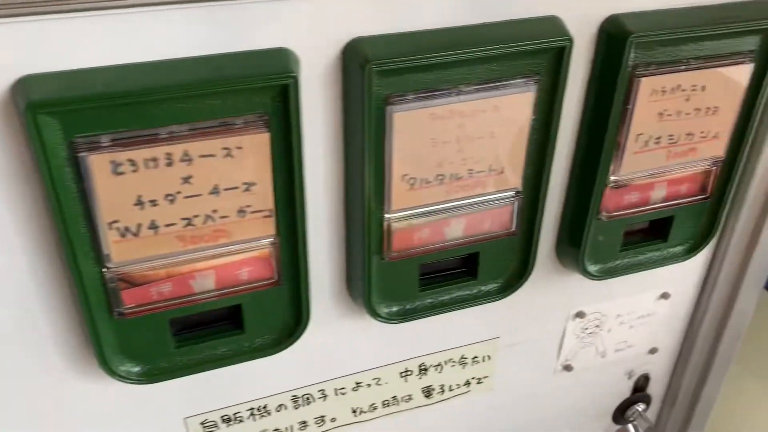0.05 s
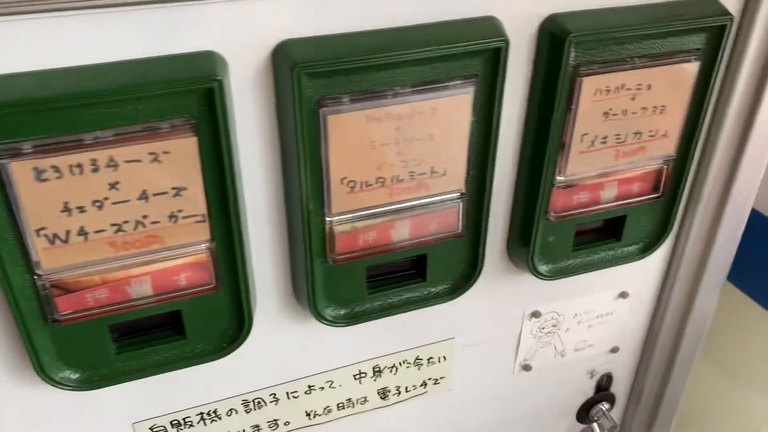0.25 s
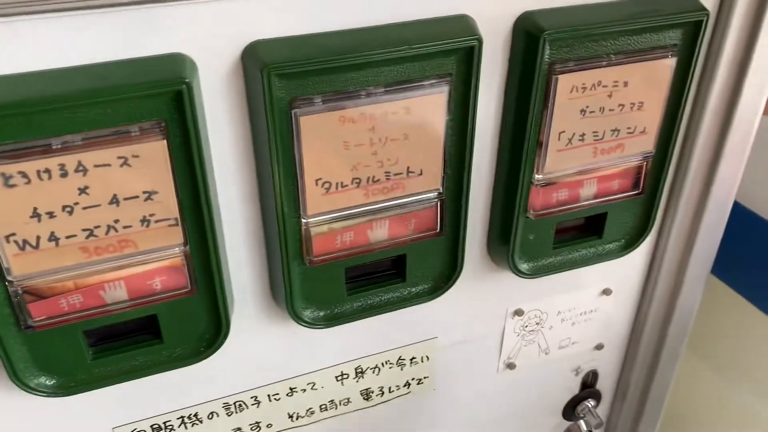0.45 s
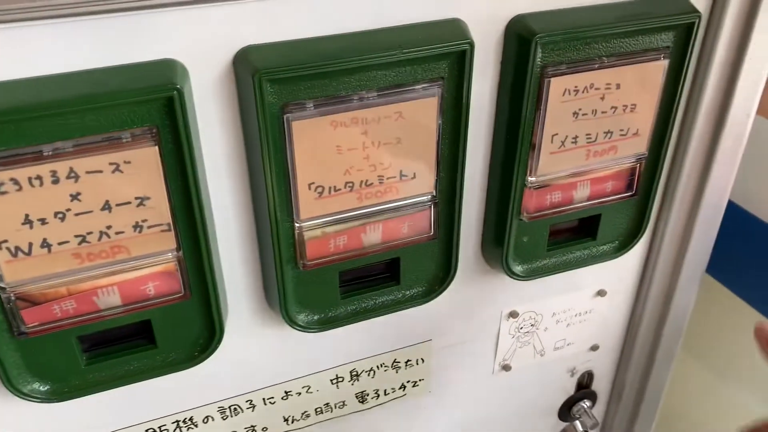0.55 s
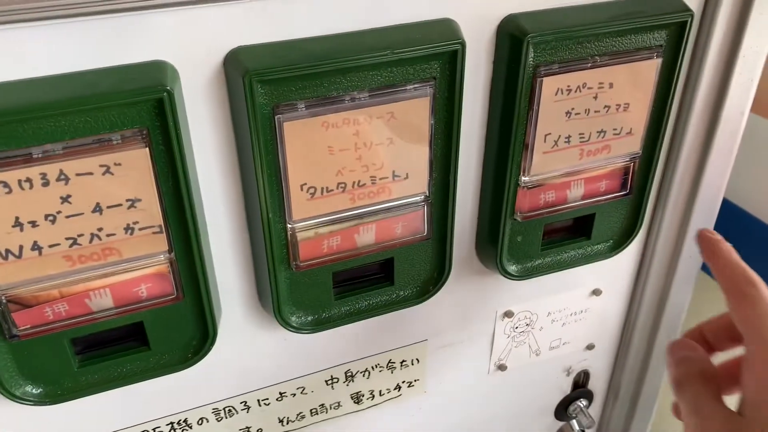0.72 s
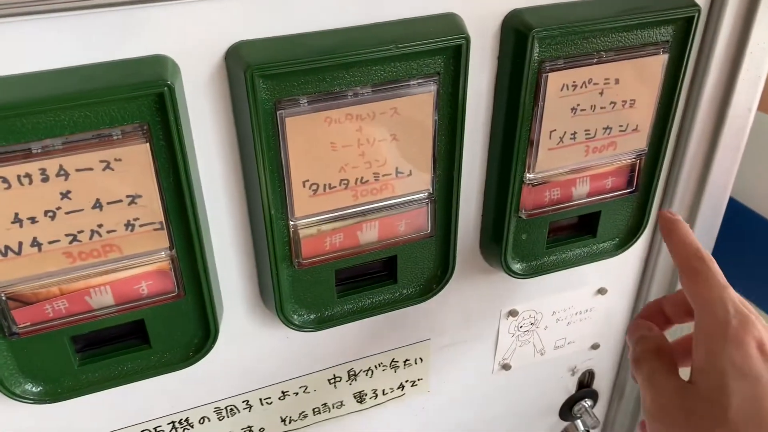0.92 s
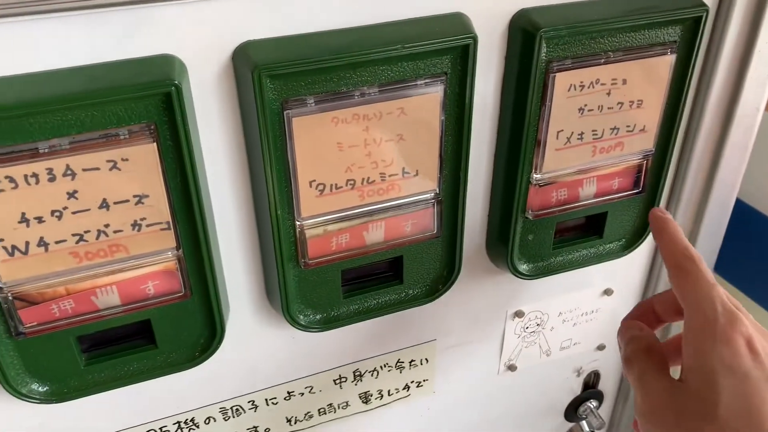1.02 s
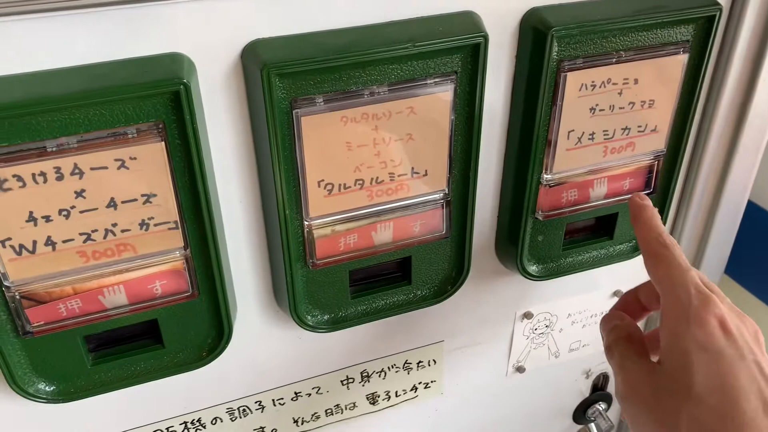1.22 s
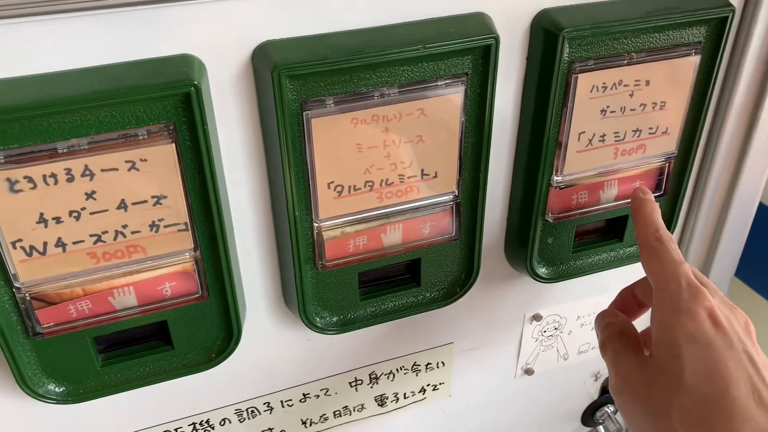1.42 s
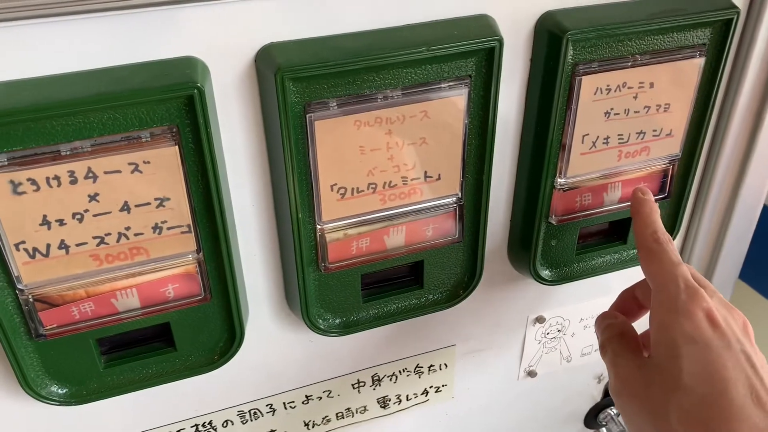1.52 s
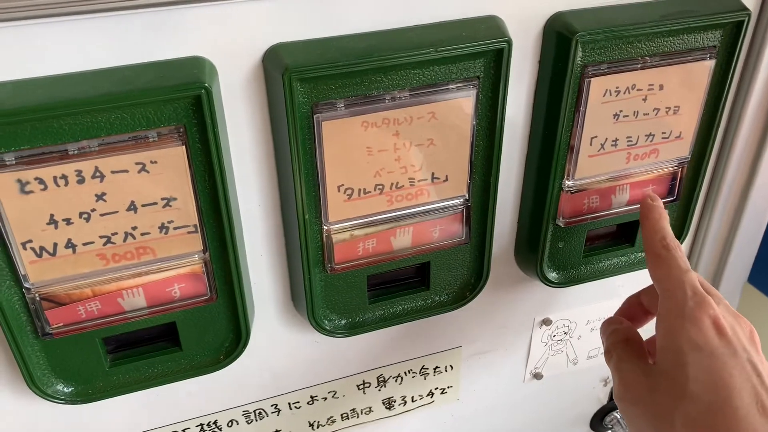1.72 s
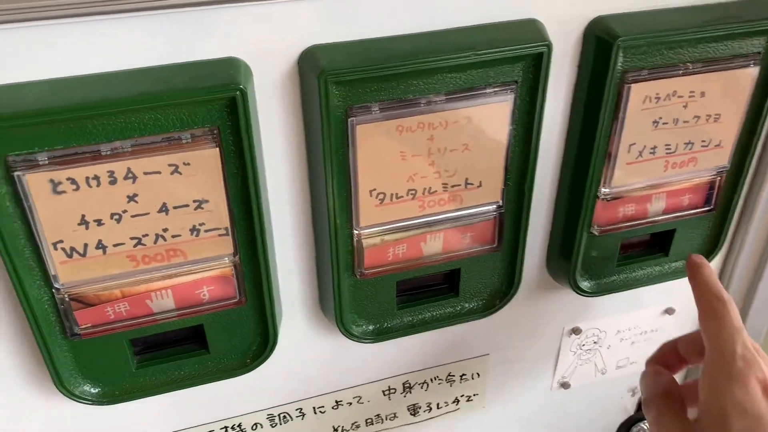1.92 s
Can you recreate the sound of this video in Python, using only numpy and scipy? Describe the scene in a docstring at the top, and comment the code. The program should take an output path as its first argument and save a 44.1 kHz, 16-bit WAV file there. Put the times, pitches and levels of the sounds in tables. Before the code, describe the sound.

A coin rattles and clunks through a vending machine, followed by a short mechanical whir.

```python
"""A coin clatters down behind the steel door of a vending machine, close up, and lands with two clunks.
Each blow cracks, shakes the cabinet and rings the chute, track and box; the coin adds its own chinks.
The mechanism rattles and whirs with a regular throb, then stops; a small metal part pings now and then.
A thin motor whine and a low rumble come up with the whir and linger. Under it all, the cooling
compressor hums in the dull fan noise of a small room."""
import sys
import numpy as np
from scipy import signal
from scipy.fft import rfft, irfft
from scipy.io import wavfile

SR = 44100
rng = np.random.default_rng(int(sys.argv[2]) if len(sys.argv) > 2 else 0)


def wrap_up_sound(samples):
    """Save the sound to the file named by the first command line argument, as 16-bit audio."""
    columns = np.atleast_2d(samples).T
    # keep every value between -1 and 1, then stretch to whole-number steps
    tamed = np.clip(columns, -1, 1)
    steps = np.round(tamed * 32767).astype(np.int16)
    wavfile.write(sys.argv[1], SR, steps)


N = 85995
T = np.arange(N) / SR
FREQS = np.maximum(np.arange(N // 2 + 1) * SR / N, 1)

# the coin's blows: t/s, level/dB, bass/dB, treble/dB, crack/dB, chute/dB, track/dB, box/dB
# (the crack has its own level; the other trims ride on the blow's level)
BLOWS = [(0.166, -46.5, -6, -6, -61, -14, -4, -13.5), (0.212, -30.5, 6.5, -11.5, -38, -13, -6, -26),
         (0.284, -42, -4.5, 4, -50, -18, -17, -8.5), (0.311, -27.5, -3.5, 2, -15.5, -15, 3, -12),
         (0.353, -28.5, 3, 3, -19, -22.5, 5, -17.5), (0.377, -26, -13, 2, -28.5, -13, -2, -7),
         (0.387, -22.5, 4.5, -1.5, -15.5, -3.5, -11, -21.5), (0.399, -29.5, -3.5, -14, -37, 5, -5, -20),
         (0.411, -18.5, -13, -2.5, -23, -7, 2.5, -18), (0.429, -21, -1, -10, -26, -4, 1.5, -12),
         (0.478, -23, 2, -7, -29.5, -0.5, 3, -8), (0.494, -28, 3, -3, -18.5, 3, -5, -21),
         (0.52, -26.5, 6.5, 2, -32, -8, -1, -14), (0.571, -17.5, -1.5, 5.5, -10, 1.5, -11, 1.5),
         (0.593, -21.5, 0, 7, -11, -25.5, -14, 1), (0.666, -18, -5, 3, -15, 4.5, -4.5, -1),
         (0.752, -26, -6.5, -0.5, -32, 3.5, -7.5, -5.5), (0.845, -35, 8, 8.5, -23, -5.5, -24.5, -2),
         (0.896, -41.5, -1, 5, -32, -16, -14, 0.5), (0.952, -39, -9, -13, -53, 5.5, 1.5, -9),
         (1.028, -41, -7, 4.5, -32, -12, -4, -1), (1.05, -41, -3, 0, -39, 2, 2, 3.5),
         (1.555, -49, -9, 7, -44, -17.5, -11.5, -2.5)]
# tone of the cabinet's dense ring and of the crack: f/Hz, level/dB
CABINET_COLOUR = [(100, -38), (250, -9.5), (480, -4.5), (700, -10), (1000, 3.5), (1450, -3), (2000, 1),
                  (3000, 3), (4600, -2.5), (7000, -8), (9500, -9.5), (11500, -10.5), (14000, 0.5),
                  (16000, -22.5)]
CRACK_COLOUR = [(300, -22), (2000, 2), (3200, 5.5), (4500, -4), (7000, -5.5), (9000, 2), (11500, -10.5),
                (14300, -0.5), (16000, -11)]
# the cabinet's quick decay and long tail: f/Hz, t60/s
CABINET_T60 = [(200, 0.51), (1000, 0.1), (3000, 0.14), (7000, 0.17), (14000, 0.021)]
TAIL_T60 = [(200, .6), (1000, 1), (3000, 0.43), (7000, 0.51), (14000, 0.15)]
# modes of the chute, upper track, lower box, coin and pawl: f/Hz, level/dB, t60/s
CHUTE_MODES = [(1001, 1, 0.14), (1131, -1, 0.097), (1144, -6, 0.35)]
TRACK_MODES = [(1790, -5, .12), (1950, -3, .09), (2140, -5, .15), (2366, -4.5, .25), (2510, -6, .2),
               (2573, -8, .25), (2830, -7, .15), (2940, -8, .18), (3040, -1, .07), (3253, -6, .14),
               (4400, -12, .16)]
BOX_MODES = [(1500, -13, .15), (1764, -7, .22), (1945, -8, .4), (2573, -9, .25), (2760, -11, .2),
             (2945, -8, .3), (3112, -7, .45), (3265, -10, .25), (3415, -7, .22), (3499, -7, .18),
             (3595, -8, .33), (3956, -12, .22), (4361, -9, .25), (4651, -10, .25), (4803, -12, .28),
             (6240, -15, .2), (6470, -13, .2), (9189, -14, .18)]
COIN_MODES = [(7467, -3, 0.2), (13300, -5, .05), (14416, -1, 0.06), (14900, -5, .05)]
PAWL_MODES = [(4764, 0, .17), (4880, -7, .1), (5190, -11, .12)]
# cues for the coin's chinks and the pawl's pings: t/s, level/dB
CHINKS = [(0.388, -33), (0.45, -38), (0.479, -36), (0.495, -24)]
PINGS = [(0.285, -39), (0.944, -44), (1.027, -30.5), (1.187, -40.5), (1.252, -43), (1.368, -46)]
# fader curves of the whir and the rumble: t/s, level/dB
WHIR_FADER = [(.74, -52), (.82, -33.5), (.93, -40), (1.0, -35.5), (1.07, -36.5), (1.16, -43), (1.4, -43.5),
              (1.56, -43), (1.68, -43)]
RUMBLE_FADER = [(0, -65), (.76, -46.5), (.87, -40.5), (1.25, -39), (1.45, -47), (1.95, -46)]
# tone of the whir and of the room: f/Hz, level/dB
WHIR_COLOUR = [(200, 11), (600, -14.5), (1100, 13), (1550, 1), (2400, 2), (4000, -2), (5200, 2.5),
               (8000, -10.5), (10500, -18.5), (13000, -8), (16000, -23)]
ROOM_COLOUR = [(25, -20), (43, 8.5), (62, -21), (100, 2.5), (200, -0.5), (300, -9.5), (450, -9),
               (640, -15.5), (900, -14), (1400, -22), (2300, -24), (3500, -37), (5500, -38.5),
               (8000, -55.5), (15000, -59)]
# resonances of the mechanism: f/Hz, width/Hz, level/dB
WHIR_RESONANCES = [(1910, 60, 10), (2800, 90, 7), (3135, 60, 12), (3620, 90, 7), (3960, 40, 4),
                   (4540, 90, 3), (4760, 55, 5), (5190, 50, 5), (6420, 70, 6), (6700, 65, 7), (8230, 70, 9),
                   (8550, 60, 9), (9890, 130, 9)]
# compressor tones: f/Hz, level/dB, left over right/dB
HUM_TONES = [(146.05, -36.5, -4.5), (101.3, -51, -0.5), (294.3, -54.5, -6), (350, -59, 0.5),
             (788.6, -62, -2.5)]
# stereo width of the noise at the door and in the room: f/Hz, left-right likeness (1 is mono)
DOOR_LIKENESS = [(150, 1), (400, 0.38), (1000, 0.19), (2500, 0.12), (5000, 0.091), (9000, 1), (15000, 0.9)]
ROOM_LIKENESS = [(60, 0.98), (150, 0.91), (300, 0.33), (1000, 0.15), (4000, 0.15)]
# panning through the door: f/Hz, left over right/dB
DOOR_BALANCE = [(150, -2), (700, 2.5), (1300, 0.5), (2400, 3), (4400, -1), (15000, 0)]
# phase through the door: f/Hz, left lead/rad
DOOR_PHASE = [(150, 0), (1150, 1.09), (1500, 4), (2100, 4.5), (2800, 2.5), (3500, 5), (4400, 0.1),
              (5900, 5), (7500, 2), (9300, 0.5), (11600, -2), (14100, -7.5), (15800, -8)]

CABINET_DB, TAIL_DB, CABINET_ATTACK_S = -0.5, -7, 0.01
BASS_BELOW_HZ, TREBLE_FROM_HZ, TREBLE_OCTAVES = 1330, 1640, 1.97
CRACK_DB, CRACK_ATTACK_S, CRACK_T60_S = -0.5, .0055, 0.038
RING_DB, RING_SCATTER_DB, RING_ATTACK_S = -3, 1, 0.0035
GRAINS_PER_S, GRAIN_MIX, GRAIN_SPREAD_DB = 300, .7, 4.5
WHIR_RING_DB, WHIR_WANDER_DB, WHIR_WANDER_HZ = 2, 2.5, 19
WHIR_STOP_S, WHIR_T60_S, WHIR_TREBLE_HZ, WHIR_TREBLE_T60_S = 1.68, .27, 6070, 0.16
THROB_DB, THROB_PEAK_S, THROB_PERIOD_S = 0.9, 1.32, .0595
WHINE_HZ, WHINE_DB, WHINE_WAVER_DB, WHINE_START_S, WHINE_FADE_S = 900, -55.5, 3.5, .8, .2
RUMBLE_HZ, RUMBLE_WAVER_RAD, RUMBLE_WAVER_DB, RUMBLE_WAVER_HZ = 75.3, 1.4, 0.5, 5.8
HUM_WAVER_DB, MOTOR_WAVER_RAD = -0.9, 0.058
WALLS_DB, WALLS_DECAY_S, WALLS_ABOVE_HZ, WALLS_LIKENESS = -3.5, 0.011, 1200, 0.63
ROOM_DB, ROOM_LOW_CUT_HZ, HIGH_CUT_HZ = -41.5, 42.4, 15900
SIDES = np.array([[.5], [-.5]])  # splits a stereo offset between left and right


def clatter():
    """Each blow wakes the cabinet's dense modes: bands of noise with a quick decay and a faint tail."""
    edges = np.concatenate([np.geomspace(90, 6000, 15), np.linspace(7500, 16500, 7)])
    centres = np.sqrt(edges[1:] * edges[:-1])
    shares = from_db(at_hz(CABINET_COLOUR, centres)) * np.sqrt(np.diff(edges))
    shares = shares / np.linalg.norm(shares)
    noises = [stereo_noise(DOOR_LIKENESS) for _ in range(2)]
    attack = np.hanning(int(CABINET_ATTACK_S * SR))
    out = 0
    for k, hz in enumerate(centres):
        treble = np.clip(np.log2(hz / TREBLE_FROM_HZ) / TREBLE_OCTAVES, 0, 1)
        bass = np.clip(np.log2(BASS_BELOW_HZ / hz), 0, 1)
        energy = np.zeros(N)
        for s, db, bass_db, treble_db, *_ in BLOWS:
            start = int(s * SR)
            gain = from_db(db + bass * bass_db + treble * treble_db)
            energy[start:start + len(attack)] += gain ** 2 * attack / attack.sum()
        quick, tail = (signal.lfilter([1], [1, -decay(1 / SR, at_hz(t60, hz)) ** 2], energy)
                       for t60 in (CABINET_T60, TAIL_T60))
        envelope = np.sqrt(quick + tail * from_db(TAIL_DB) ** 2)
        bandpass = signal.butter(3, edges[k:k + 2], "band", fs=SR, output="sos")
        band = rms_one(signal.sosfilt(bandpass, noises[k % 2]))
        out = out + shares[k] * band * envelope
    return from_db(CABINET_DB) * out


def cracks():
    """A short bright crack tops each blow, much stronger when the coin hits with its hard edge."""
    energy = 0
    for s, _, _, _, crack_db, *_ in BLOWS:
        attack = np.clip((T - s) / CRACK_ATTACK_S, 0, 1)
        energy = energy + (from_db(crack_db) * attack * decay(T - s, CRACK_T60_S)) ** 2
    noise = coloured(stereo_noise(DOOR_LIKENESS), from_db(at_hz(CRACK_COLOUR, FREQS)))
    return from_db(CRACK_DB) * np.sqrt(energy) * noise


def struck(s, db, modes):
    """Metal struck at time s: each mode swells as the blow spreads, then rings out as a dying sine."""
    out, start = np.zeros(N), int(s * SR)
    age = T[:min(N - start, SR * 2 // 3)]
    attack = np.sin(np.pi / 2 * np.clip(age / RING_ATTACK_S, 0, 1))
    for hz, mode_db, t60 in modes:
        gain = from_db(db + mode_db + RING_SCATTER_DB * rng.standard_normal())
        tone = np.sin(2 * np.pi * (hz * age + rng.random()))
        out[start:start + len(age)] += gain * attack * decay(age, t60) * tone
    return out


def coin_path_rings():
    """Every blow rings the chute, the track and the box in a blend of its own."""
    return sum(struck(s, RING_DB + db + part_db, modes)
               for s, db, _, _, _, *parts_db in BLOWS
               for modes, part_db in zip((CHUTE_MODES, TRACK_MODES, BOX_MODES), parts_db))


def coin_chinks():
    """The tumbling coin rings in its own high modes."""
    return sum(struck(s, db, COIN_MODES) for s, db in CHINKS)


def whir():
    """Fine rattling contacts excite the mechanism's resonances, swelling once a turn until it stops."""
    grains = (rng.random(N) < GRAINS_PER_S / SR) * rng.choice([-1, 1], N)
    grains = grains * from_db(GRAIN_SPREAD_DB * rng.standard_normal(N))
    contacts = stereo_noise(DOOR_LIKENESS) + GRAIN_MIX * rms_one(grains)
    spectrum = rfft(contacts) * from_db(at_hz(WHIR_COLOUR, FREQS))
    rings = 0
    for hz, width_hz, db in WHIR_RESONANCES:
        resonance = 1 / (1 + 1j * (FREQS ** 2 - hz ** 2) / (FREQS * width_hz))
        gain = from_db(db + WHIR_RING_DB + WHIR_WANDER_DB * drift(WHIR_WANDER_HZ))
        rings = rings + gain * irfft(spectrum * resonance, N)
    running = rms_one(irfft(spectrum, N) + rings)
    throb_db = THROB_DB * np.cos(2 * np.pi * (T - THROB_PEAK_S) / THROB_PERIOD_S)
    level = from_db(in_time(WHIR_FADER) + throb_db) * (T > WHIR_FADER[0][0])
    # after the stop, the top end dies faster than the body
    body = irfft(rfft(running) / (1 + (FREQS / WHIR_TREBLE_HZ) ** 8), N)
    top = running - body
    since_stop = T - WHIR_STOP_S
    return level * (body * decay(since_stop, WHIR_T60_S) + top * decay(since_stop, WHIR_TREBLE_T60_S))


def pawl_pings():
    """A small metal part, perhaps a pawl, is flicked now and then and rings brightly."""
    return sum(struck(s, db, PAWL_MODES) for s, db in PINGS)


def motor_whine():
    """A thin, fluttering motor tone fades in with the mechanism and holds."""
    level = from_db(WHINE_DB + WHINE_WAVER_DB * drift(13))
    fade_in = np.clip((T - WHINE_START_S) / WHINE_FADE_S, 0, 1)
    tone = np.sqrt(2) * np.sin(2 * np.pi * WHINE_HZ * T + MOTOR_WAVER_RAD * drift(5))
    return level * fade_in * tone


def rumble():
    """An unsteady low drone swells while the mechanism runs."""
    tone = np.sqrt(2) * np.sin(2 * np.pi * RUMBLE_HZ * T + RUMBLE_WAVER_RAD * drift(RUMBLE_WAVER_HZ))
    return from_db(in_time(RUMBLE_FADER) + RUMBLE_WAVER_DB * drift(RUMBLE_WAVER_HZ)) * tone


def compressor():
    """The cooling compressor lays a bed of slightly wavering hum tones, each with its own pan."""
    out = 0
    for hz, db, pan_db in HUM_TONES:
        tone = np.sqrt(2) * np.sin(2 * np.pi * (hz * T + rng.random()) + MOTOR_WAVER_RAD * drift(4.4))
        out = out + tone * from_db(db + HUM_WAVER_DB * drift(2.8) + pan_db * SIDES)
    return out


def room_tone():
    """Dull fan and room noise, centred in the lows and wide above."""
    response = from_db(at_hz(ROOM_COLOUR, FREQS)) / np.hypot(1, (ROOM_LOW_CUT_HZ / FREQS) ** 4)
    return from_db(ROOM_DB) * coloured(stereo_noise(ROOM_LIKENESS), response)


def between_walls(x):
    """Short bounces between the steel walls give the noise a fine metallic sheen."""
    centre = np.sqrt(WALLS_LIKENESS) * rng.standard_normal(N)
    wide = np.sqrt(1 - WALLS_LIKENESS) * rng.standard_normal((2, N))
    bounces = rms_one((centre + wide) * np.exp(-T / WALLS_DECAY_S)) / np.sqrt(N)
    highpass = 1 / (1 + WALLS_ABOVE_HZ / (1j * FREQS))
    return irfft(rfft(x) * (1 + from_db(WALLS_DB) * rfft(bounces) * highpass), N)


def through_door(x):
    """Sound from behind the door reaches left and right with different phase and level."""
    lead = np.interp(FREQS, *np.transpose(DOOR_PHASE))
    pan = from_db(SIDES * at_hz(DOOR_BALANCE, FREQS))
    return irfft(rfft(x) * np.exp(1j * SIDES * lead) * pan, N)


def stereo_noise(likeness):
    """White noise whose two sides are as alike as the table says."""
    alike = np.clip(at_hz(likeness, FREQS), -1, 1)
    mid, side = rfft(rng.standard_normal((2, N)))
    return rms_one(irfft(np.sqrt(1 + alike) * mid + np.sqrt(1 - alike) * side * [[1], [-1]], N))


def coloured(x, response):
    """EQ by a frequency response, at unit power."""
    return rms_one(irfft(rfft(x) * response, N))


def drift(rate_hz):
    """Slow random wander of spread 1."""
    return coloured(rng.standard_normal(N), 1 / (1 + (FREQS / rate_hz) ** 2))


def decay(age, t60):
    """Hold at 1 until age zero, then fall 60 dB every t60."""
    return np.exp(-np.log(1000) * np.maximum(age, 0) / t60)


def at_hz(points, hz):
    """Read a table on a log-frequency axis."""
    f, value = np.transpose(points)
    return np.interp(np.log(hz), np.log(np.maximum(f, 1)), value)


def in_time(points):
    """Join fader points by straight lines."""
    return np.interp(T, *np.transpose(points))


def from_db(db):
    """Decibels to gain."""
    return 10 ** (np.asarray(db) / 20)


def rms_one(x):
    """Scale to unit power."""
    return x / np.sqrt(np.mean(x ** 2) + 1e-20)


def scene():
    """Coin and mechanism behind the door, over a bed of hum and room tone."""
    noisy = between_walls(cracks() + clatter() + whir())
    pitched = coin_path_rings() + coin_chinks() + pawl_pings()
    return through_door(noisy + pitched) + compressor() + motor_whine() + rumble() + room_tone()


def record(dry):
    """Clip the peaks at full scale, then cut the very top steeply."""
    high_cut = signal.ellip(10, .2, 70, HIGH_CUT_HZ, fs=SR, output="sos")
    return signal.sosfilt(high_cut, np.clip(dry, -1, 1))


dry = scene()
out = record(dry)
wrap_up_sound(out)
```